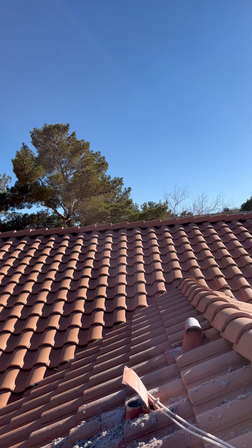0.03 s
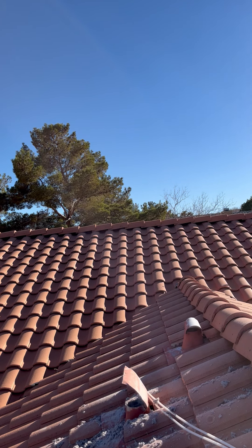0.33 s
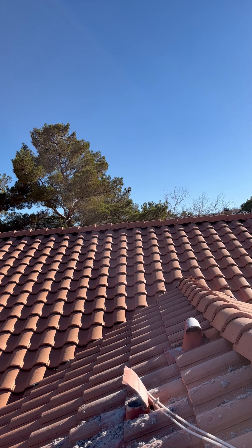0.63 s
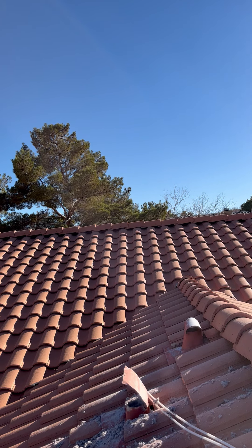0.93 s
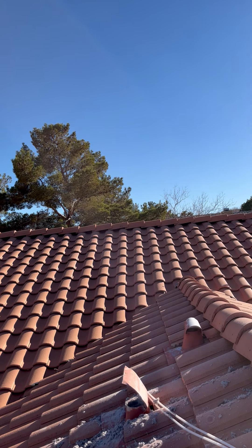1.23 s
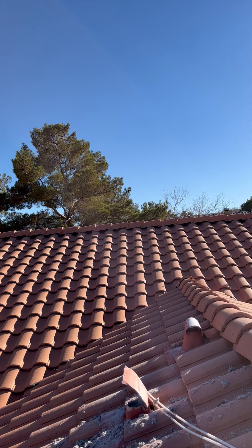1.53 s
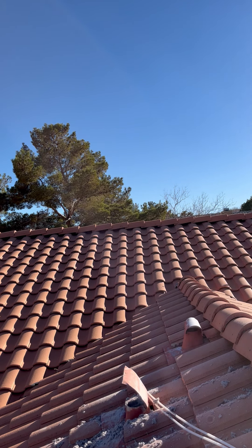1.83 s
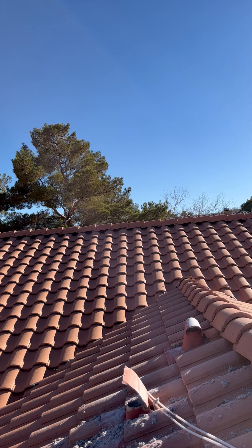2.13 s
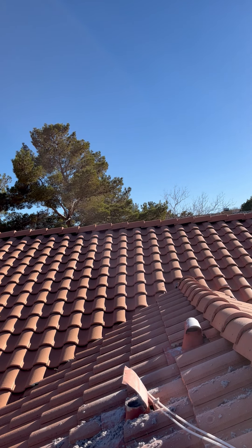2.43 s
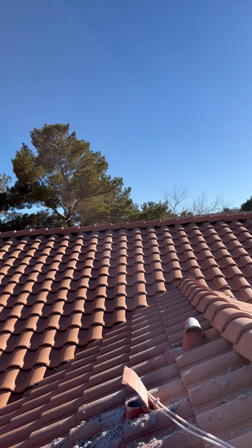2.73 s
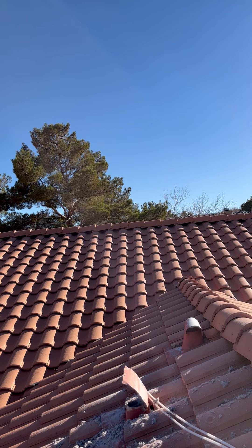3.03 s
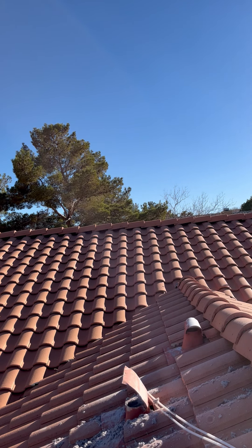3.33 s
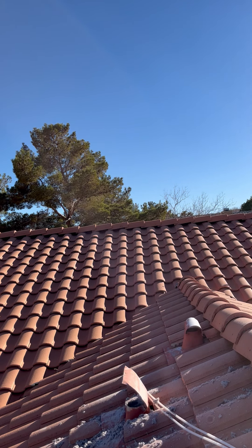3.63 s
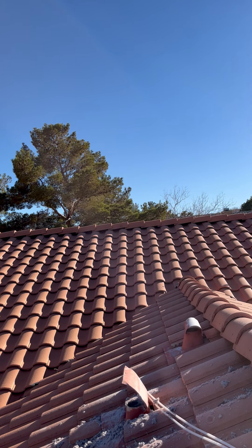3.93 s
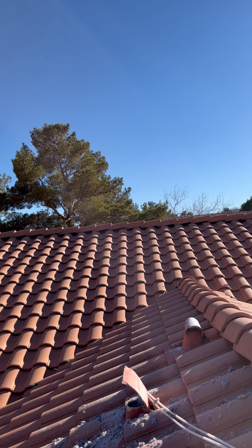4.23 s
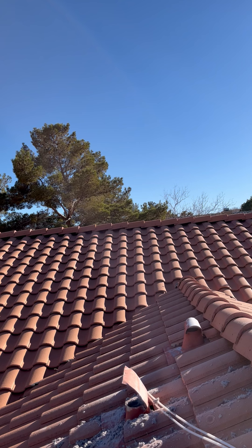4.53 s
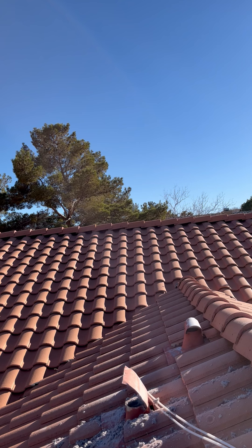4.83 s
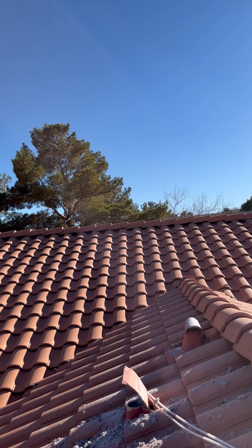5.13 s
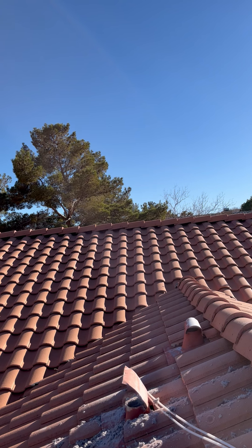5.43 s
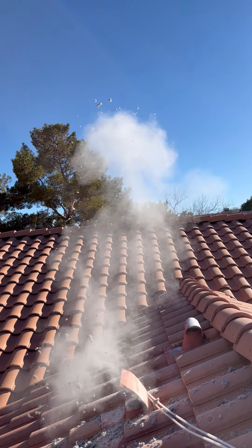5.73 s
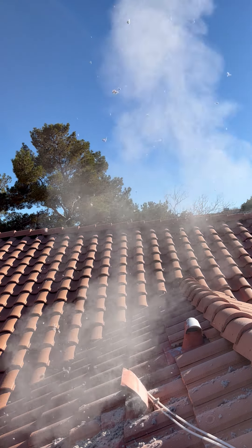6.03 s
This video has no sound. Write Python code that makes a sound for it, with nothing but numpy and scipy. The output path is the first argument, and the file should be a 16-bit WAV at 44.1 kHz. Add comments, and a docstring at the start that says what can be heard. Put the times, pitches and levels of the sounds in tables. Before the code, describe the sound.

Quiet distant traffic and a low hum, then a pipe knocks and pops loudly, blasting out air and a spray of dust.

```python
"""Distant traffic and a machine's hum come first, with faint scuffs and, at 4 s, a small bird's thin call.
At 5.4 s compressed air clears a blocked vent pipe on a tiled roof. The plug knocks inside, exciting the
resonances of the air column, and pops out with a hollow boom. A turbulent jet rushes after it, spraying
dust and grit over the tiles, and the roofs around return a weak echo."""
import sys
import numpy as np
from scipy import signal
from scipy.fft import rfft, irfft
from scipy.io import wavfile
from scipy.ndimage import uniform_filter1d

SR = 44100
rng = np.random.default_rng(int(sys.argv[2]) if len(sys.argv) > 2 else 0)


def digitize_waveform(pressure):
    """Quantize a signal to 16-bit integers and store it at the path in sys.argv[1].

    Rows of a 2-D input are taken as channels; values are limited to [-1, 1].
    """
    field = np.atleast_2d(pressure).T
    bounded = np.clip(field, -1, 1)
    quanta = np.round(bounded * 32767).astype(np.int16)
    wavfile.write(sys.argv[1], SR, quanta)


N = 277830
TIME = np.arange(N) / SR
BINS = np.fft.rfftfreq(N, 1 / SR)
RELEASE_S = 5.487  # the plug gives way


# knocks inside the pipe: the plug's first jolt, its echo along the pipe, and a further jolt: (time [s],
# strength [dB])
KNOCK_HITS = [(5.397, -27), (5.4368, -40), (5.4643, -31.5)]
# modes of the closed pipe: (frequency [Hz], gain [dB], T60 [s])
CLOSED_MODES = [(75, -18.5, .15), (156.4, -12.5, 0.14), (249.5, -15.5, 0.19), (374, 2.5, 0.072),
                (417.7, 4, 0.095), (483, 1, 0.11), (668, -20, 0.039), (724, -34, 0.097), (925, -33, 0.19),
                (1152, -40, .14)]

def knocks(attack_s=0.0028):
    """Impulse response: each knock rings the damped modes of the closed air column."""
    out = np.zeros(N)
    for s, strength_db in KNOCK_HITS:
        start = round(s * SR)
        t = TIME[:min(SR // 2, N - start)]
        ring = sum(gain_of(db - 60 * t / t60) * np.sin(2 * np.pi * hz * t)
                   for hz, db, t60 in CLOSED_MODES)
        out[start:start + len(t)] += gain_of(strength_db) * ring * (1 - np.exp(-(t / attack_s) ** 2))
    return out


# the plug bursts out, and a second, thinner burst follows: (time [s], strength [dB], low cutoff [Hz])
BURSTS = [(5.4912, -12, 26), (5.5077, -17.5, 318)]
# modes of the opened pipe: (frequency [Hz], gain [dB], build-up [s])
OPEN_MODES = [(62.6, -0.5, .027), (187, 2.5, .015), (320.5, -2.5, 0.0079), (478, -2, 0.0071),
              (670, -13.5, 0.011), (944, -21, 0.0099), (1086, -18, 0.0058)]

def pop(steepness=4.2):
    """Pipe resonance: released air drives the modes, the lowest peaking last; the mouth drains them."""
    out = np.zeros(N)
    for s, strength_db, low_hz in BURSTS:
        start = round(s * SR)
        t = TIME[:min(SR // 2, N - start)]
        for hz, db, build_s in OPEN_MODES:
            age = t / build_s
            swell = (age * np.exp((1 - age ** 2) / 2)) ** steepness
            drive = gain_of(strength_db + db) / np.hypot(1, (low_hz / hz) ** 2)
            out[start:start + len(t)] += drive * swell * np.sin(2 * np.pi * hz * t)
    return out


def hoot(peak_db=-28, release_hz=525, climb_hz_per_s=2400, rise_s=0.012, stop_s=.002):
    """Resonant frequency rises as a column shortens: the air above the moving plug hoots upward."""
    age = TIME - RELEASE_S
    cycles = age * (release_hz + climb_hz_per_s * age / 2)
    swell = np.exp(-(age / np.where(age < 0, rise_s, stop_s)) ** 2 / 2)
    return gain_of(peak_db) * swell * np.sqrt(2) * np.sin(2 * np.pi * cycles)


# air squeezing past the plug: (frequency [Hz], relative density [dB])
LEAK_SPECTRUM = [(60, -17), (180, -20.5), (270, -8), (350, -23), (420, -11.5), (510, 3.5), (590, -11),
                 (700, -12), (770, -21), (900, -24), (1150, -23), (1300, -41), (2000, -55), (4000, -81)]

def leak(peak_db=-27, build_db_per_s=421, spent_db_per_s=1800):
    """Pressure-driven flow: the leak grows with the pressure behind the plug and dies at the release."""
    pressure_db = -build_db_per_s * np.maximum(RELEASE_S - TIME, 0) - spent_db_per_s * since(RELEASE_S)
    flow = gain_of(peak_db + pressure_db) * (TIME > KNOCK_HITS[0][0])
    return turbulence(flow, LEAK_SPECTRUM)


# escape of the stored air: (peak time [s], level [dB], rise [s], T60 [s])
AIR_GUST = [(5.515, -20.5, .013, 0.23)]
# air rushing through the open pipe: (frequency [Hz], relative density [dB])
JET_SPECTRUM = [(25, -32), (60, 1), (115, -1.5), (165, 0.5), (230, -3), (300, -3), (420, -5.5), (540, -0.5),
                (590, -6.5), (680, -18.5), (780, -23), (920, -17.5), (1140, -24), (1250, -28.5),
                (1600, -36.5), (3000, -45.5), (8000, -67.5)]

def jet(blow_db=-29, sag_db_per_s=45.5, shut_s=5.659, shut_fall_s=.005, drain_db=-45.5, drain_t60=0.67):
    """Jet noise follows the flow: a gust, the hose's sagging blow until it is shut, the pipe draining."""
    hose_open = np.exp(-since(shut_s) / shut_fall_s)
    blow = gain_of(blow_db - sag_db_per_s * since(RELEASE_S)) * hose_open
    drain = gain_of(drain_db - 60 * since(shut_s) / drain_t60)
    flow = onset(RELEASE_S, attack_s=0.0051) * np.sqrt(swells(AIR_GUST) ** 2 + blow ** 2 + drain ** 2)
    return turbulence(flow, JET_SPECTRUM)


def turbulence(flow, spectrum, flutter_db=0.5):
    """Turbulent flow is unsteady: its noise flutters slightly in level."""
    return flow * gain_of(flutter_db * wander(90)) * colour(rng.standard_normal(N), spectrum)


# spurts of dust and grit: (peak time [s], level [dB], rise [s], T60 [s])
GRIT_SPURTS = [(5.504, -61, 0.0047, 0.48), (5.514, -58.5, 0.0062, 0.15), (5.578, -52, 0.0058, 0.25),
               (5.585, -41.5, 0.0021, 0.078), (5.605, -47.5, 0.0029, 0.12), (5.6325, -49.5, 0.0014, 0.065),
               (5.7235, -65, 0.00097, 0.078)]
# their hiss: (frequency [Hz], relative density [dB])
SPRAY_SPECTRUM = [(300, -15), (1100, -13), (1550, 8), (1750, -1), (2100, 10.5), (2550, 0), (3300, 2),
                  (4200, -0.5), (5300, -6), (7500, 0.5), (10000, -2), (13000, -8), (15500, -12)]

def spray(scatter=0.25):
    """Scattering: grit hisses out of the mouth and is heard both directly and off the tiles."""
    direct = ports(colour(grit(per_s=5000, spread_db=2.5), SPRAY_SPECTRUM))
    scattered = pan_bands(colour(rng.standard_normal((2, N)), SPRAY_SPECTRUM), VENT_BALANCE)
    return (direct + scatter * scattered) * swells(GRIT_SPURTS)


# the dust cloud comes down: (peak time [s], level [dB], rise [s], T60 [s])
SETTLING = [(5.785, -76.5, .04, 0.53)]
# its patter: (frequency [Hz], relative density [dB])
DUST_SPECTRUM = [(1000, -5), (2600, -16), (3600, -2), (4300, -8), (5000, 3), (5700, -12), (7000, -21),
                 (15000, -29)]

def dust():
    """Impact noise: fine grains patter back onto the tiles."""
    grains = np.array([grit(per_s=830, spread_db=1.0) for port in range(2)])
    return colour(grains, DUST_SPECTRUM) * swells(SETTLING)


def grit(per_s, spread_db):
    """Shot noise: tiny impacts of uneven size arrive independently at random."""
    size = gain_of(spread_db * np.minimum(rng.exponential(1, N), 4))
    return unit_rms(size * rng.choice([-1., 1.], N) * (rng.random(N) < per_s / SR))


# the vent's phase at the two microphone ports: (frequency [Hz], left lead [rad])
VENT_PHASE = [(40, 0), (500, -.45), (1300, -.4), (2300, .5), (2900, 3.2), (3500, 3), (4200, .5), (4900, .2),
              (6100, 3.1), (8800, 6.1), (9600, 6.4), (12400, 9.4), (15300, 12.5)]
# its balance there: (frequency [Hz], left minus right [dB])
VENT_BALANCE = [(60, .7), (300, 1.2), (1300, 1.7), (2000, -1), (2700, -7), (4400, -2), (8000, 0),
                (15000, .3)]

def ports(x):
    """Diffraction round the microphone's housing gives its two ports different phases and levels."""
    left = rfft(x)
    right = left * np.exp(-1j * curve_at(VENT_PHASE))
    return pan_bands(irfft(np.array([left, right]), N), VENT_BALANCE)


# echo from roofs and trees: (frequency [Hz], T60 [s])
ECHO_DECAY = [(60, .6), (200, .65), (500, .7), (1200, .65), (3000, .35), (12000, .25)]

def echo(x, delay_s=0.015):
    """Reverberation: scattered reflections merge into a tail, each band decaying at its own rate."""
    flat = [(20, 0), (20000, 0)]
    reflections = diffuse(flat)[:, :SR] * (TIME[:SR] > delay_s)
    hz, t, bands = signal.stft(reflections, SR, nperseg=512)
    decay = gain_of(-60 * t / curve_at(ECHO_DECAY, hz)[:, None])
    tail = signal.istft(bands * decay, SR, nperseg=512)[1]
    return signal.fftconvolve(x, tail / np.linalg.norm(tail[0]), axes=1)[:, :N]


# the bird's notes: (peak time [s], frequency [Hz], level [dB], half length [s])
BIRD_NOTES = [(3.952, 9450, -88.5, 0.018), (4.049, 10850, -83.5, .023), (4.157, 10920, -80.5, 0.024)]

def bird_notes(arch_hz=45):
    """Frequency modulation: three very high, buzzy notes each arch in pitch."""
    out = np.zeros(N)
    for s, hz, db, half_s in BIRD_NOTES:
        away = ((TIME - s) / half_s) ** 2
        out += gain_of(db) * np.exp(-away / 2) * whistle(hz - arch_hz * away, buzz_hz=150)
    return out


def bird_slide(start_s=4.2, length_s=.47, hz=9720, db=-93, fall_hz_per_s=3200, fall_db_per_s=20):
    """A linear frequency sweep: the call ends in a clean whistle that falls, wavers and fades."""
    age = since(start_s)
    waver_db = 4.5 * wander(18)
    level = gain_of(db - fall_db_per_s * age + waver_db) * onset(start_s, attack_s=.015)
    fade_out = np.clip(4 * (1 - age / length_s), 0, 1)
    return level * fade_out * whistle(hz - fall_hz_per_s * age, buzz_hz=22)


def whistle(hz, buzz_hz):
    """Random frequency modulation roughens a pure tone of unit rms."""
    return np.sqrt(2) * np.sin(2 * np.pi * np.cumsum(hz + buzz_hz * wander(220)) / SR)


# distant cars: (time when nearest [s], relative level [dB], time to fade by 3 dB [s])
CAR_PASSES = [(.25, -62, 0.44), (1.4, -58.5, 0.43), (2.8, -69.5, 0.1), (4.55, -70, 0.2), (5.92, -63, 0.24)]
# their low rumble and their road noise: (frequency [Hz], relative density [dB])
RUMBLE_SPECTRUM = [(10, -34.5), (25, -16.5), (40, -7), (60, 0.5), (80, -2), (110, -8), (150, -10),
                   (205, -12.5), (260, -22), (1500, -95.5)]
ROAD_SPECTRUM = [(100, -2), (215, -0.5), (340, -2.5), (480, -1.5), (640, -1.5), (850, -10.5), (1400, -19.5),
                 (1900, -35.5), (3000, -54), (8000, -81)]

def traffic(falloff=1.8, wash_db=-80, road_gain_db=-3, rumble_db=-64, rumble_share=0.17, waver_db=1.0):
    """Spreading loss: each car's amplitude falls as a power of distance, over a wash of farther ones."""
    power = gain_of(wash_db) ** 2
    for s, db, fade_s in CAR_PASSES:
        distance_squared = 1 + ((TIME - s) / fade_s) ** 2 * (2 ** (1 / falloff) - 1)
        power += gain_of(db) ** 2 / distance_squared ** falloff
    road_db = 10 * np.log10(power)
    rumble = gain_of(rumble_db + rumble_share * (road_db - road_db.mean())) * diffuse(RUMBLE_SPECTRUM)
    road = gain_of(road_db + road_gain_db + waver_db * wander(18)) * drifting(diffuse(ROAD_SPECTRUM))
    return rumble + road


def drifting(x, depth_db=1.17):
    """Atmospheric fading: moving air makes the bands of a far sound come and go."""
    bands = signal.stft(x, nperseg=1024)[2]
    patches = uniform_filter1d(rng.standard_normal(bands.shape[:0:-1]), size=10, axis=0)  # over time
    patches = unit_rms(uniform_filter1d(patches, size=5, axis=1))  # over frequency
    return signal.istft(bands * gain_of(depth_db * patches.T), nperseg=1024)[1][:, :N]


# surges of a far engine: (peak time [s], level [dB], rise [s], T60 [s])
ENGINE_SURGES = [(.42, -61.5, 0.12, 1.8), (2.62, -65.5, 0.19, 2)]
# its drone: (frequency [Hz], relative density [dB])
ENGINE_SPECTRUM = [(40, -26), (85, 1.5), (130, -8.5), (175, -1.5), (225, 10), (290, -5), (400, -23),
                   (1500, -88)]

def engine():
    """Amplitude modulation: the low noise of a far engine swells twice and dies away."""
    return swells(ENGINE_SURGES) * diffuse(ENGINE_SPECTRUM)


# a machine's hum: (frequency [Hz], peak level [dB])
HUM_TONES = [(120.1, -57.5), (104.6, -67), (201, -77.5)]
# its thin whine: (frequency [Hz], width [Hz], rms level [dB])
WHINE_BANDS = [(2070, 40, -101), (4930, 55, -103.5)]

def machine(waver_db=1.0, pitch_jitter=0.0015):
    """Random modulation broadens spectral lines: the hum wavers and the whine flutters."""
    out = np.zeros(N)
    for hz, db in HUM_TONES:
        level = gain_of(db + waver_db * wander(3.1))
        out += level * np.sin(2 * np.pi * hz * np.cumsum(1 + pitch_jitter * wander(38)) / SR)
    for hz, width_hz, db in WHINE_BANDS:
        out += gain_of(db) * unit_rms(wander(width_hz) * np.sin(2 * np.pi * hz * TIME))
    return pan_bands(out, AMBIENT_BALANCE)


# faint scuffs and the ticks that go with them: (peak time [s], level [dB], rise [s], T60 [s])
SCUFF_EVENTS = [(.17, -73, 0.044, 1.6), (.44, -72, .04, .9), (.67, -71.5, 0.066, .6), (2.2, -75.5, .05, .8),
                (2.63, -70.5, .03, .4), (4.28, -65.5, 0.022, 0.64)]
TICK_EVENTS = [(2.65, -96, .015, .3), (2.72, -91, .016, .17), (4.257, -93, .002, .06),
               (4.295, -87.5, .004, .05)]
# their timbres: (frequency [Hz], relative density [dB])
SCUFF_SPECTRUM = [(300, -1.5), (900, -5.5), (1400, -2), (1800, -32), (3500, -34), (5400, -30), (7000, -40),
                  (10500, -40), (13000, -55)]
TICK_SPECTRUM = [(2500, -9), (5400, 6), (7000, 10), (11000, -7), (13000, -21)]

def scuffs():
    """Noise transients: long, dull bursts are heard as scuffs and short, bright ones as ticks."""
    return swells(SCUFF_EVENTS) * diffuse(SCUFF_SPECTRUM) + swells(TICK_EVENTS) * diffuse(TICK_SPECTRUM)


# still outdoor air: (frequency [Hz], relative density [dB])
AIR_SPECTRUM = [(100, -8), (250, -0.5), (600, -1), (1000, -8.5), (1600, -20.5), (2400, -28.5), (5000, -29),
                (6300, -40), (8500, -33.5), (10500, -39.5), (12000, -49), (15000, -52.5)]

def still_air(level_db=-69):
    """The ambient noise floor: a steady hush from all directions."""
    return gain_of(level_db) * diffuse(AIR_SPECTRUM)


# likeness of ambient sound at the two ports: (frequency [Hz], correlation [-1 to 1])
AMBIENT_COHERENCE = [(110, .99), (200, 0.89), (380, .34), (700, -0.17), (1290, -0.17), (2400, 0), (8000, 0),
                     (15000, 0.3)]
# its balance there: (frequency [Hz], left minus right [dB])
AMBIENT_BALANCE = [(60, .5), (110, 1), (200, 1.5), (500, 2.8), (1300, 2), (4400, -.5), (8000, 0)]

def diffuse(spectrum):
    """A diffuse field: noise from all around is coherent at the two ports only in the bass."""
    left, independent = rfft(rng.standard_normal((2, N)))
    coherence = np.clip(curve_at(AMBIENT_COHERENCE), -1, 1)
    right = coherence * left + np.sqrt(1 - coherence ** 2) * independent
    pair = irfft(np.array([left, right]), N)
    return pan_bands(colour(pair, spectrum), AMBIENT_BALANCE)


def pan_bands(x, balance):
    """Level difference: each band leans towards the left or the right port."""
    half_db = curve_at(balance) / 2
    return irfft(rfft(x) * gain_of([half_db, -half_db]), N)


def swells(rows):
    """Incoherent addition: envelopes with a Gaussian rise and exponential decay sum in power."""
    power = np.zeros(N)
    for s, db, rise_s, t60 in rows:
        attack = np.exp(-(np.minimum(TIME - s, 0) / rise_s) ** 2 / 2)
        power += (gain_of(db - 60 * since(s) / t60) * attack) ** 2
    return np.sqrt(power)


def colour(x, spectrum):
    """Spectral shaping, scaled to unit rms."""
    return unit_rms(irfft(rfft(x) * gain_of(curve_at(spectrum)), N))


def wander(rate_hz):
    """Low-pass noise: a random fluctuation of unit rms."""
    return unit_rms(irfft(rfft(rng.standard_normal(N)) * np.exp(-(BINS / rate_hz) ** 2), N))


def curve_at(points, hz=BINS):
    """Interpolation on a log-frequency axis."""
    point_hz, value = np.transpose(points)
    return np.interp(np.log(hz + 1), np.log(point_hz + 1), value)


def onset(s, attack_s):
    """A smooth attack from silence at time s."""
    return 1 - np.exp(-(since(s) / attack_s) ** 2)


def since(s):
    """Time elapsed after s; zero before it."""
    return np.maximum(TIME - s, 0)


def gain_of(db):
    """Decibels as an amplitude ratio."""
    return 10 ** (np.asarray(db) / 20)


def unit_rms(x):
    """Normalisation to an rms of one."""
    return x / np.sqrt(np.mean(x ** 2) + 1e-20)


def scene(echo_db=-24.5):
    """Superposition: the vent, slightly to the left, adds to its echo and the surroundings."""
    blast = ports(knocks() + hoot() + leak() + pop() + jet()) + spray()
    background = scuffs() + engine()
    vent = blast + gain_of(echo_db) * echo(blast) + dust()
    background += still_air() + traffic() + machine()
    return vent + bird_notes() + bird_slide() + background


def record(dry, low_cut_hz=22, high_cut_hz=15800):
    """Band limiting: the microphone rolls off the bass and cuts the highest treble."""
    thinned = signal.sosfilt(signal.butter(2, low_cut_hz, "highpass", fs=SR, output="sos"), dry)
    lowpass = signal.firwin(511, high_cut_hz, window=("kaiser", 9), fs=SR)
    return signal.oaconvolve(thinned, lowpass[None], "same")


dry = scene()
out = record(dry)
digitize_waveform(out)
```